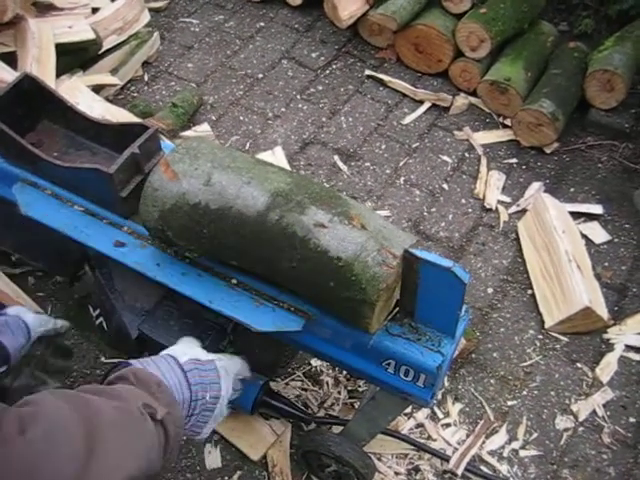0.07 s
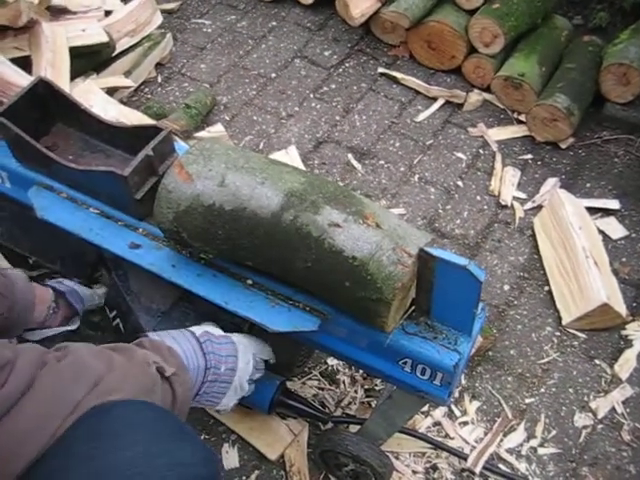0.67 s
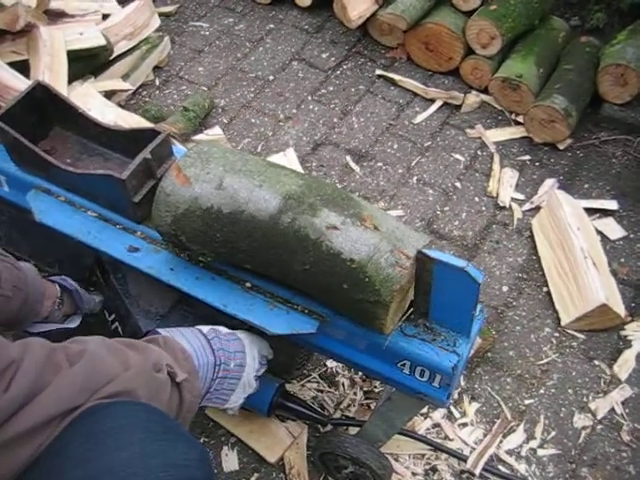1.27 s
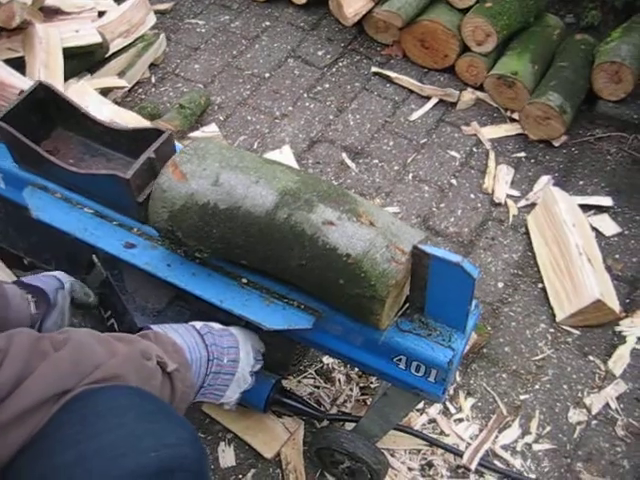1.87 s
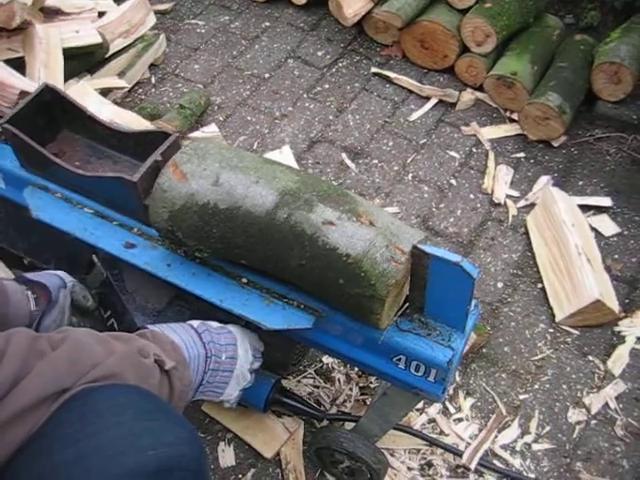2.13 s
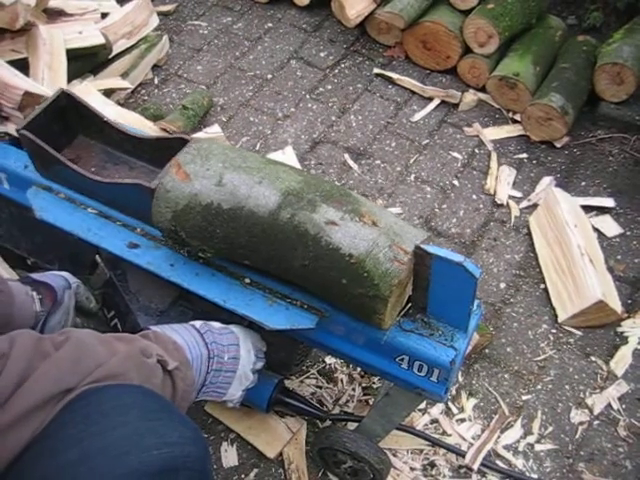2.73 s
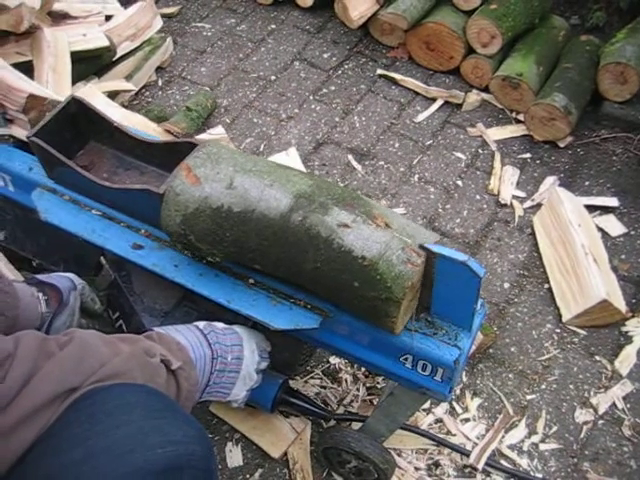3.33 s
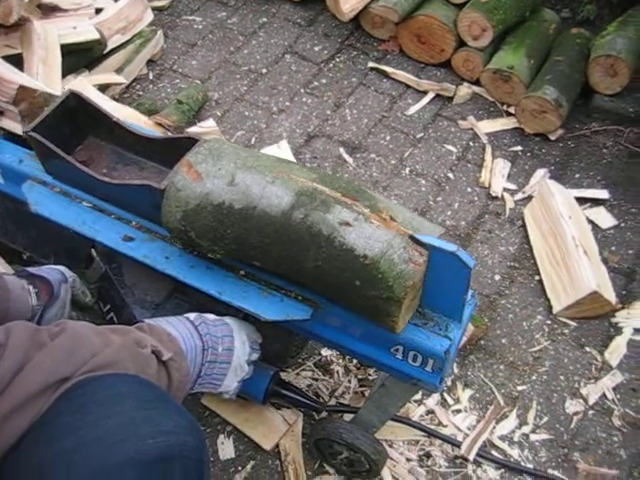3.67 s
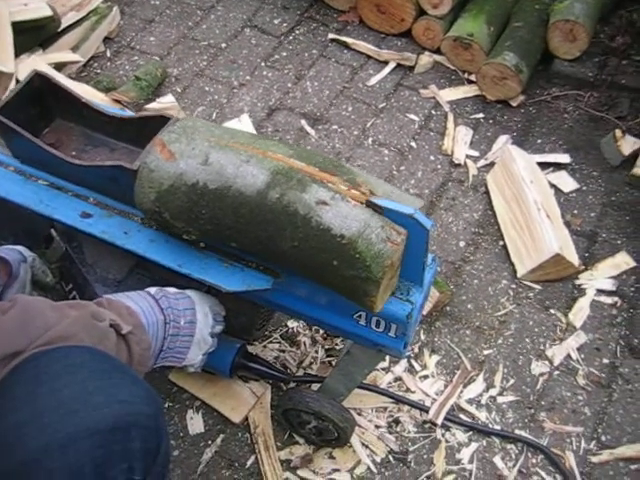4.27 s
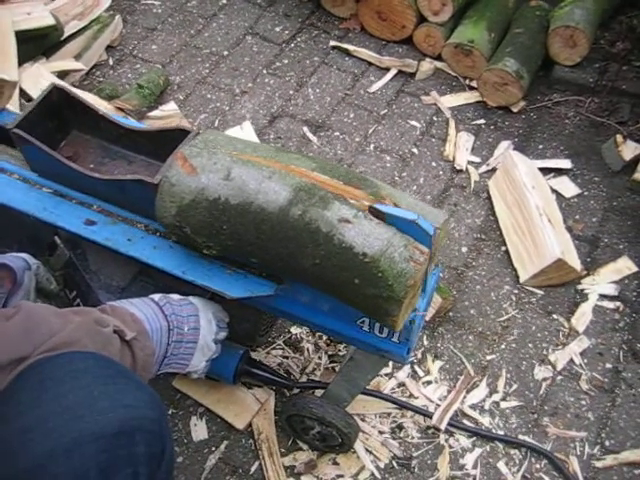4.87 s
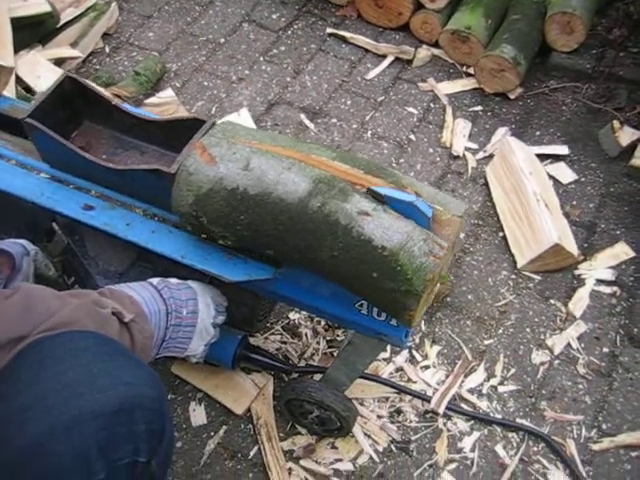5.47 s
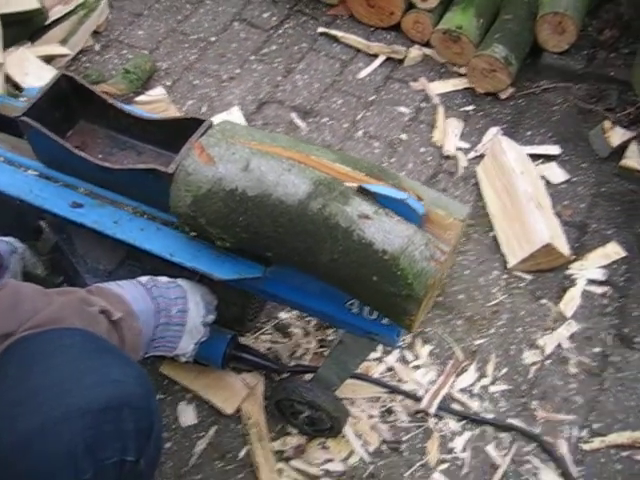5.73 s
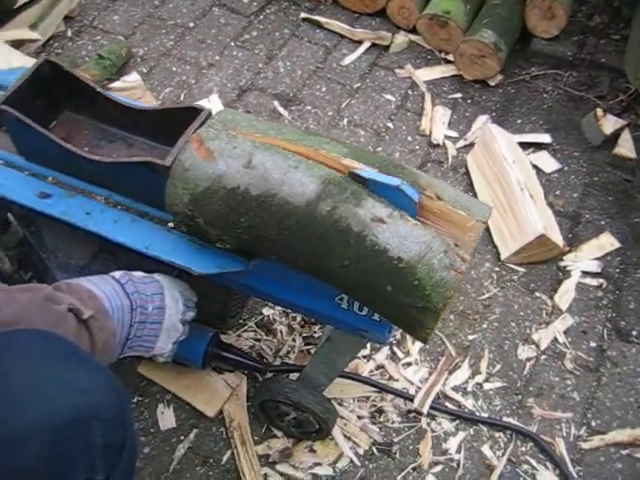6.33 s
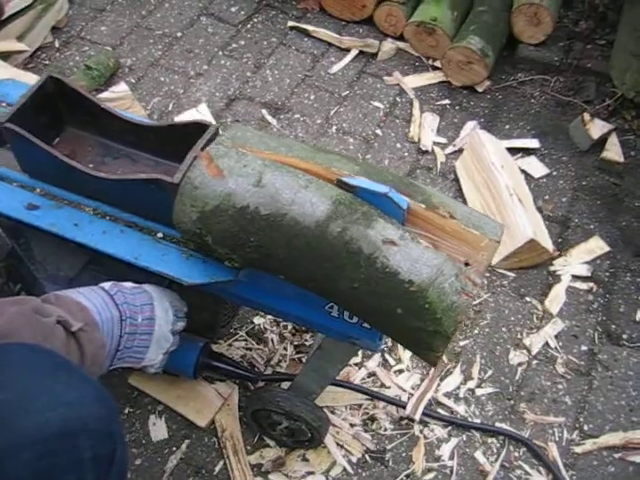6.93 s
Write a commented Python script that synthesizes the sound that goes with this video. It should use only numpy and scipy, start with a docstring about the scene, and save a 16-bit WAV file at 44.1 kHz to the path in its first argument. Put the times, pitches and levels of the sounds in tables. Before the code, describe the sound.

Birds chirp briefly in an outdoor yard, then the controls of an electric log splitter clack twice, close by. The motor starts with a harsh buzz and settles into a steady hum with pump whine and oil hiss. It strains, and the log gives way in a quick run of sharp cracks while the machine drops in level. Scattered pops and ticks of tearing wood follow as the drone slowly returns. The sound is mono and slightly dull.

```python
"""Birds chirp over a paved yard, then the controls of an electric hydraulic log splitter clack, close by. The
motor runs up with a harsh buzz from its starting winding and settles to a mains hum, while the gear pump whines
and the oil hisses. The ram presses the log on the wedge until the motor sags; the wood gives way in a run of
cracks as the level of machine and yard dips deeply and recovers slowly, then tears with scattered pops. Mono,
narrow band."""
import sys
import numpy as np
from scipy import signal
from scipy.fft import rfft, irfft, next_fast_len
from scipy.io import wavfile
from scipy.ndimage import uniform_filter1d

SR = 44100
rng = np.random.default_rng(int(sys.argv[2]) if len(sys.argv) > 2 else 0)


def to_wav(sig):
    """Store sig (one row per channel, or 1-D mono) as 16-bit WAV at the path in sys.argv[1].

    Samples outside -1..1 are clipped; the rate is SR.
    """
    pcm = np.clip(np.atleast_2d(sig), -1, 1) * 32767
    pcm = np.round(pcm).astype(np.int16)
    wavfile.write(sys.argv[1], SR, pcm.T)  # frames by channels


N = 317079
T = np.arange(N) / SR

# the machine's faders: voice -> (running free [dB], then offsets: starting [dB], wedge in the wood [dB],
# log parted [dB], full strain [dB])
VOICE_LEVELS = {"hum": (-33, 1, -0.9, -0.6, -12), "frame buzz": (-28.5, -7.5, -3.5, -4, -2),
                "rattle": (-28.5, 3, 0.5, -0.5, 0), "hiss": (-31.5, 2.5, 1.4, 1.5, 1),
                "lesser tones": (-26.5, -5.5, 0.5, 0.56, 1), "tooth rate": (-47, -3.5, 16, 1, 6.5),
                "tooth octave": (-34, -8.5, -8.5, -2, 20), "rotor whine": (-38, 2, 2.5, 3.5, -3)}
# the motor runs up, overshoots and settles: (time [s], speed [turns/s])
SHAFT_SPEED = [(0.82, 2), (0.94, 29), (1.0, 46), (1.06, 51.4), (1.13, 50.3), (1.22, 49.7), (1.38, 49.7),
               (1.44, 49.1), (1.62, 49.58)]
# the level of machine and yard dips deeply as the log breaks and recovers slowly: (time [s], level [dB])
LEVEL_DIPS = [(.7, 2), (.9, 0), (3.2, -1.5), (3.3, -11), (3.38, -16), (3.54, -13.5), (3.62, -8),
              (3.69, -13), (3.82, -7.5), (4.25, -8), (5.0, -6.5), (5.8, -3), (7.19, -2.5)]
# overtones of the hum in the frame: (multiple of the mains frequency, level [dB])
FRAME_BUZZ = [(4, -7.5), (6, 0.5), (8, -8), (10, -24.5), (12, -21), (20, -10)]
# buzz of the starting winding: (frequency at full speed [Hz], level [dB])
STARTER_TONES = [(398, -34.5), (510, -35), (748.3, -35), (899.0, -36.5), (1190, -33), (1292, -32),
                 (1394, -40.5), (1491, -37), (1674, -34), (2528, -34), (2615, -32.5), (2985, -38),
                 (3362, -38.5), (3635, -36.5), (3738, -36), (3820, -40), (4960, -45)]
# the pump's lesser tones: shaft multiple -> (level, ram biting [dB], level, log parting [dB])
PUMP_TONES = {10: (-33.5, -40.5), 11: (-40, -50.5), 16: (-43, -60.5), 20: (-50.5, -44.5), 24: (-39.5, -52),
              25: (-48.5, -46), 26: (-45.5, -41.5), 27: (-38.5, -43.5), 31: (-48.5, -47), 33: (-38, -39),
              42: (-51, -45), 44: (-43, -47), 45: (-44.5, -51), 48: (-49, -48), 49: (-44.5, -47),
              50: (-53, -44.5), 51: (-39, -38.5), 52: (-44, -36.5), 53: (-40.5, -60.5), 54: (-43, -40),
              56: (-61, -48.5), 63: (-55, -42.5), 64: (-38, -55), 72: (-38.5, -43), 73: (-40.5, -45.5),
              99: (-49.5, -51.5), 100: (-44.5, -55), 104: (-53, -50), 105: (-47, -47), 106: (-48.5, -55.5)}
# contour for the remaining shaft multiples: (frequency [Hz], level [dB])
PUMP_COMB = [(200, -55.5), (600, -61), (1300, -53.5), (2000, -51.5), (2700, -56.5), (3400, -51.5),
             (4100, -59.5), (5000, -59), (5800, -64)]
# how well the housing radiates the lesser tones: (frequency [Hz], gain [dB])
HOUSING_EQ = [(500, 0), (1400, 1), (2100, 2.5), (2550, 0), (3000, -2), (3600, 1.5), (4400, -1), (4950, 3),
              (5280, 4), (5800, 5.5)]
# colour of the housing's rattle: (frequency [Hz], level [dB])
RATTLE_EQ = [(60, -18), (150, -12), (260, -1.5), (450, -6), (650, -0.5), (900, -2.5), (1200, 1.5),
             (1500, -2.5), (1900, -7), (2400, -7), (4000, -46)]
# colour of the valve's hiss: (frequency [Hz], level [dB])
HISS_EQ = [(1200, -14.5), (1800, -3), (2200, 1), (2600, 3.5), (2950, 2), (3500, -1), (4000, 0.5),
           (4500, -2), (5200, -1.5), (5600, -11.5), (6000, -17)]
# wood cracks: (time [s], level [dB], ring [Hz], ring width [Hz], knock against snap [dB], spray t60 [s])
CRACK_CUES = [(1.41, -12.5, 2020, 700, -20, 0.069), (1.582, -11.5, 2720, 900, -25, 0.1),
              (3.2625, -7, 3600, 2590, -13, 0.025), (3.2815, -7, 3400, 3000, -18, 0.023),
              (3.2992, -9.5, 3400, 2500, -9, .02), (3.3121, -12, 3410, 2510, -25, 0.092),
              (3.3752, -10, 3150, 2600, -17, .044), (3.3935, -9.5, 4340, 1790, -19, 0.0061),
              (3.4455, -10, 3500, 2800, -16, 0.047), (3.4943, -9, 4230, 2400, -31, 0.0093),
              (3.6437, -2, 4200, 1600, -6, .011), (3.876, -15, 3650, 900, -23, 0.01),
              (3.8998, -18.5, 5300, 1000, -16, 0.015), (3.916, -15, 3400, 2200, -11, .02),
              (3.989, -13, 4450, 1300, -16, 0.016), (4.0295, -6.5, 3400, 2370, -6.5, 0.013),
              (4.277, -18, 3900, 800, -12, 0.032), (4.574, -13.5, 2450, 2030, -5, 0.017),
              (4.9671, -11, 4230, 690, -12, 0.0086), (5.9822, -8, 2240, 450, -9, 0.0081),
              (6.1818, -8, 3950, 750, -20, .02), (6.5473, -10, 4660, 2200, -27, .007)]
# the log's knock: (frequency [Hz], level [dB], t60 [s])
LOG_MODES = [(435, -7, 0.064), (810, -3, 0.051), (1010, 0, 0.1), (1092, 16, 0.037), (1400, 3.5, 0.052),
             (2220, -13.5, 0.026)]
# switch and lever: (time [s], peak [dB], ring time factor, centre of the blow's spectrum [Hz],
# its width [octaves], scrape against ring [dB])
CLACK_CUES = [(0.7362, -5, 0.98, 1980, 0.33, 7), (0.815, -4, 0.62, 900, 1.6, -2)]
# the steel they strike: (frequency [Hz], level [dB], base t60 [s])
STEEL_MODES = [(480, -1.5, 0.15), (824, -10, 0.053), (900, 4, .04), (1045, 10.5, 0.067), (1230, -7, 0.024),
               (1710, -16.5, 0.8), (1953, -15.5, 0.43), (2360, 8.5, 0.036), (2490, 6, 0.032),
               (2760, -16.5, 0.096), (2870, -11.5, 0.082), (3340, -10.5, .05), (4200, -0.5, 0.044)]
# colour of their scrape: (frequency [Hz], level [dB])
SCRAPE_EQ = [(200, -17.5), (700, -16.5), (1200, 3), (1900, -14), (2700, 4.5), (3600, -4.5),
             (5500, -19.5), (7000, -43)]
# bumps, creaks and rings, a soft handling thump, and brief swells of the pump's tooth tone and the
# rotor whine: (peak time [s], rise [s], fall [s], frequency [Hz], resonator width [Hz], level [dB])
SWELL_CUES = [(0.08, .04, .07, 1760, 90, -52), (0.59, .025, 0.032, 196, 130, -38.5),
              (0.779, .02, 0.045, 170, 230, -40.5), (0.87, .002, 0.014, 745, 110, -28),
              (0.924, 0.0022, 0.0087, 684, 200, -19.5), (0.94, 0.019, .017, 777, 160, -18.5),
              (0.955, 0.037, .05, 3250, 850, -25.5), (0.985, .02, .03, 1250, 600, -25.5),
              (0.986, 0.015, 0.024, 294, 75, -23.5), (0.975, 0.019, .025, 200, 70, -32.5),
              (1.04, 0.081, .1, 412, 90, -33), (1.41, .02, 0.066, 239, 180, -25.5),
              (1.53, 0.04, 0.061, 488, 130, -28), (2.83, 0.14, 0.07, 421, 110, -30),
              (2.95, .036, .055, 450, 25, -27.5), (3.03, 0.12, 0.25, 523, 110, -33),
              (1.55, .02, 0.026, 4050, 300, -28), (3.083, .03, 0.02, 4460, 330, -30.5),
              (3.252, 0.041, 0.075, 4830, 600, -30.5), (3.297, .017, 0.017, 220, 170, -27),
              (3.369, .025, 0.065, 4200, 1600, -30), (3.46, 0.0045, 0.021, 190, 150, -35),
              (3.63, .018, 0.0092, 4180, 2200, -37), (5.8, 0.024, 0.045, 119, 130, -37),
              (6.12, 0.092, .07, 3050, 700, -31), (6.551, .15, .14, 2920, 170, -37.5),
              (6.8, .13, .13, 1437, 8.3, -33.5)]
# bird notes: (start [s], length [s], first pitch [Hz], last pitch [Hz], arch [Hz], level [dB], rasp)
BIRD_NOTES = [(0.217, .09, 3620, 3740, 60, -47, 40), (0.381, 0.072, 5270, 4130, -350, -36.5, 400),
              (0.42, 0.086, 4470, 4520, 0, -46, 500), (0.569, 0.05, 4700, 4130, -200, -42, 350),
              (0.625, .095, 3700, 3780, 100, -40, 45), (0.736, 0.091, 3580, 3340, -33, -37.5, 45)]
# colour of the outdoor air: (frequency [Hz], level [dB])
AIR_EQ = [(12, -19), (20, -12.5), (51, -16), (82, -23), (148, -25), (319, -29), (395, -28), (1540, -33.5),
          (1730, -34), (2600, -34.5), (3630, -33), (5330, -38), (6000, -58.5), (7800, -87.5), (13200, -120)]
# colour of the low rumble: (frequency [Hz], level [dB])
RUMBLE_EQ = [(20, 1), (55, -5), (120, -3), (250, -10), (1000, -60.5)]

MAINS_HZ, GEAR_TEETH = 50, 9
FULL_SPEED, SAG_SPEED = 49.58, 1.4  # turns/s: running free, lost at full strain
STRAIN_FROM_S, GIVES_S, RELAX_S = 2.87, 3.28, .1
# stages of the stroke: (start [s], fade length [s])
HUM_ON, OIL_ON, WINDING_IN, WINDING_OUT = (.83, .11), (.86, .13), (.985, .054), (1.365, .024)
SETTLES, BITES, OPENS, PARTS = (1.5, .22), (2.51, .51), (3.97, 1.8), (5.68, .36)
STARTER_DB, JUDDER_TURNS, JUDDER_FADE_S = 1, .006, .09
SWITCH_OVER_DB = -5.5  # the hum falters when the starting winding drops out
CREEP_S, CREEP_DB = .0061, -13.5  # fibres start to tear just before each crack
SNAPS_PER_S, SNAP_FLOOR_DB = 28, -28.5
STRAIN_SNAPS_PER_S, STRAIN_SNAP_DB = 1300, 5.5  # added at full strain
BAND_EDGE_HZ, TOP_HZ = 5950, 15800


def motor_hum():
    """The stator is squeezed twice a mains cycle and thumps the frame, unevenly until the motor settles."""
    angle = 2 * np.pi * (MAINS_HZ * T + .0053 * drift(12))
    flutter = .072 + .66 * (1 - ramp(SETTLES))
    buzz = sum(amp(db) * (1 + flutter * drift(15)) * np.cos(round(k) * angle) for k, db in FRAME_BUZZ)
    falter = amp(SWITCH_OVER_DB * (ramp(WINDING_OUT) - ramp(SETTLES)))
    hum = falter * np.cos(2 * angle)
    return -np.sqrt(2) * (ramp(HUM_ON) * fader("hum") * hum + ramp(OIL_ON) * fader("frame buzz") * buzz)


def starter_buzz(shaft):
    """The starting winding makes the rotor judder and its slots buzz until it drops out."""
    judder = JUDDER_TURNS * np.exp(-np.maximum(T - WINDING_IN[0], 0) / JUDDER_FADE_S)
    rotor = shaft + judder * drift(110)
    buzz = sum(amp(db) * tone(rotor * hz / FULL_SPEED, waver=.66, rate=30) for hz, db in STARTER_TONES)
    sizzle = amp(-35) * unit_rms(noise_band(N, hz=3400, width=780))
    return amp(STARTER_DB) * (ramp(WINDING_IN) - ramp(WINDING_OUT)) * (buzz + sizzle)


def pump_whine(shaft):
    """Uneven gear teeth sing at multiples of the shaft speed; the balance shifts as the log opens."""
    leading = {GEAR_TEETH: "tooth rate", 2 * GEAR_TEETH: "tooth octave", 29: "rotor whine"}
    biting, parting = np.zeros((2, N))
    for k in range(3, 119):
        if k not in leading:
            nominal_hz = k * MAINS_HZ
            scattered_db = level_at(PUMP_COMB, nominal_hz) + 4.5 * rng.standard_normal(2)
            biting_db, parting_db = PUMP_TONES.get(k, scattered_db)
            partial = amp(level_at(HOUSING_EQ, nominal_hz)) * tone(k * shaft, waver=.39, rate=6)
            biting += amp(biting_db) * partial
            parting += amp(parting_db) * partial
    crossfade = np.maximum(ramp(OPENS), .25)
    comb = (1 - crossfade) * unit_rms(biting) + crossfade * unit_rms(parting)
    lead = sum(fader(voice) * tone(k * shaft, waver=.23, rate=12) for k, voice in leading.items())
    return fader("lesser tones") * comb + lead


def oil_flow(shaft):
    """Each tooth squeezes out a puff of oil: the housing rattles and the valve hisses."""
    angle = 2 * np.pi * shaft
    mains_ripple = .093 * np.cos(4 * np.pi * MAINS_HZ * T)
    puffs = 1 + .085 * np.cos(GEAR_TEETH * angle) + .067 * np.cos(angle) + mains_ripple
    puffs *= amp(1.4 * drift(130))
    rattle = fader("rattle") * amp(1.4 * drift(17)) * colour(puffs * rng.standard_normal(N), RATTLE_EQ)
    hiss = fader("hiss") * amp(1.2 * drift(16)) * colour(puffs * rng.standard_normal(N), HISS_EQ)
    return rattle + hiss


def wood_cracks():
    """Fibres tear, then break: a snap and a spray of smaller ones ring the splinter; the log knocks."""
    out, pre_roll = np.zeros(N), SR // 40
    t = np.arange(-pre_roll, SR // 8) / SR
    after = np.maximum(t, 0)
    knock = unit_peak(ring(LOG_MODES, after))
    lowpass = signal.butter(4, BAND_EDGE_HZ, fs=SR, output="sos")
    creep = amp(CREEP_DB) * np.exp(-abs(t) / CREEP_S)
    tail = amp(-23 - 60 * after / .094)
    for time, db, hz, width, knock_db, t60 in CRACK_CUES:
        envelope = np.where(t < 0, creep, amp(-60 * after / t60) + tail)
        spray = rng.standard_normal(len(t)) * envelope
        spray[pre_roll + 10] += 4  # the sharp transient of the break
        snap = unit_peak(signal.sosfilt(lowpass, resonate(spray, hz, width)))
        add(out, time + t[0], amp(db + 2) * unit_peak(snap + amp(knock_db) * knock))
    return out


def fibre_ticks():
    """Single fibres tick at the wedge, thickest and hardest just as the log gives way."""
    load = strain()
    rate = SNAPS_PER_S * ramp(BITES) + STRAIN_SNAPS_PER_S * load
    db = SNAP_FLOOR_DB + STRAIN_SNAP_DB * load ** 2 + 4.6 * np.minimum(rng.exponential(1, N), 2.5)
    snaps = amp(db) * (rng.random(N) < rate / SR) * rng.choice([-1, 1], N)
    t = np.arange(400) / SR
    ticks = [np.exp(-t * hz / 1.9) * np.sin(2 * np.pi * hz * t) for hz in np.geomspace(2200, 5400, 8)]
    choice = rng.integers(0, len(ticks), N)
    return sum(np.convolve(snaps * (choice == k), tick)[:N] for k, tick in enumerate(ticks))


def control_clacks():
    """A short scrape and blow from the switch or lever set the steel ringing."""
    out, t = np.zeros(N), np.arange(SR // 4) / SR
    for time, db, stretch, centre_hz, octaves, scrape_db in CLACK_CUES:
        modes = [(hz, level - 3 * (np.log2(hz / centre_hz) / octaves) ** 2, t60)
                 for hz, level, t60 in STEEL_MODES]
        # staggered mode onsets smear the attack
        body = sum(np.roll(ring([mode], t, stretch), rng.integers(0, 60)) for mode in modes)
        scrape = colour(rng.standard_normal(len(t)), SCRAPE_EQ)
        scrape *= amp(-60 * t / .024) + amp(-13.5 - 60 * t / .24)
        add(out, time, amp(db) * unit_peak(unit_peak(body) + amp(scrape_db) * unit_peak(scrape)))
    return out


def bumps_and_swells():
    """Noise bands swell and fade as bumps, creaks, rings, a handling thump, tooth tone and rotor whine."""
    out = np.zeros(N)
    for time, rise, fall, hz, width, db in SWELL_CUES:
        t = np.arange(-2 * rise, 2 * fall, 1 / SR)
        band = noise_band(SR, hz, width)[-len(t):]
        swell = np.exp(-(t / np.where(t < 0, rise, fall)) ** 2)
        add(out, time - 2 * rise, amp(db) * unit_rms(swell * band) * np.sqrt(np.mean(swell ** 2)))
    return out


def birds():
    """Thin whistles and raspy chirps: each note glides in an arch, swells and fades."""
    out = np.zeros(N)
    for start, length, first_hz, last_hz, arch_hz, db, rasp in BIRD_NOTES:
        progress = np.arange(0, length, 1 / SR) / length
        arch = np.sin(np.pi * progress)
        jitter = unit_rms(uniform_filter1d(rng.standard_normal(SR), 40))[:len(arch)]
        hz = first_hz + (last_hz - first_hz) * progress + arch_hz * arch + .6 * rasp * jitter
        envelope = arch ** .49 * (1 + .42 * drift(150)[:len(arch)])
        add(out, start, np.sqrt(2) * amp(db) * envelope * np.sin(2 * np.pi * np.cumsum(hz) / SR))
    return out


def yard_air():
    """A bed of outdoor air with an uneven low rumble."""
    air = amp(-44) * colour(rng.standard_normal(N), AIR_EQ)
    rumble = colour(rng.standard_normal(N), RUMBLE_EQ)
    return air + amp(-54 + 2.6 * drift(6.4)) * rumble


def strain():
    """The load on the ram builds to 1 at the moment the log gives way, then relaxes."""
    build = np.clip((T - STRAIN_FROM_S) / (GIVES_S - STRAIN_FROM_S), 0, 1) ** 2
    return build * np.exp(-np.maximum(T - GIVES_S, 0) / RELAX_S)


def fader(voice):
    """A voice's gain follows the stage of the stroke and the strain."""
    free_db, starting_db, wedged_db, parted_db, strained_db = VOICE_LEVELS[voice]
    parted = ramp(PARTS)
    stage_db = starting_db * (1 - ramp(SETTLES)) + wedged_db * (ramp(BITES) - parted) + parted_db * parted
    return amp(free_db + stage_db + strained_db * strain())


def ramp(stage):
    """Fades from 0 to 1 as a stage of the stroke sets in."""
    start, length = stage
    return np.clip((T - start) / length, 0, 1)


def automation(points):
    """A curve through (time, value) breakpoints."""
    return np.interp(T, *np.transpose(points))


def drift(rate):
    """A random wander with `rate` new values a second."""
    return np.interp(T * rate, np.arange(2048), rng.standard_normal(2048))


def tone(turns, waver, rate):
    """A partial of rms near 1 whose strength and phase waver."""
    strength, slip = 1 + waver * drift(rate), waver * drift(rate)
    return np.sqrt(2) * strength * np.cos(2 * np.pi * (turns + rng.random()) + slip)


def ring(modes, t, stretch=1):
    """The decaying modes of a struck body."""
    return sum(amp(db - 60 * t / (t60 * stretch)) * np.sin(2 * np.pi * hz * t) for hz, db, t60 in modes)


def resonate(x, hz, width):
    """A resonance of gain 1, its width in Hz."""
    carrier = np.exp(2j * np.pi * hz * np.arange(len(x)) / SR)
    pole = np.exp(-np.pi * width / SR)
    return 2 * (carrier * signal.lfilter([1 - pole], [1, -pole], x / carrier + 1e-18)).real


def noise_band(samples, hz, width):
    """Noise passed twice through a resonance."""
    return resonate(resonate(rng.standard_normal(samples), hz, width), hz, width)


def level_at(eq, hz):
    """An EQ curve's level in dB, on a log-frequency axis."""
    freqs, db = np.transpose(eq)
    return np.interp(np.log(hz + 1), np.log(freqs + 1), db)


def colour(x, eq):
    """Applies an EQ curve and scales to rms 1."""
    size = next_fast_len(len(x))
    gain = amp(level_at(eq, np.fft.rfftfreq(size, 1 / SR)))
    return unit_rms(irfft(rfft(x, size) * gain, size)[:len(x)])


def amp(db):
    """Decibels to gain."""
    return 10 ** (np.asarray(db) / 20)


def unit_rms(x):
    """Scales to rms 1."""
    return x / np.sqrt(np.mean(x ** 2) + 1e-20)


def unit_peak(x):
    """Scales to peak 1."""
    return x / (abs(x).max() + 1e-20)


def add(mix, time, sound):
    """Drops a sound into the mix at a time in seconds."""
    part = mix[max(round(time * SR), 0):][:len(sound)]
    part += sound[:len(part)]


def scene():
    """Machine, log and yard in mono; the shaft slows under strain."""
    speed = automation(SHAFT_SPEED) - SAG_SPEED * strain() + .012 * drift(25)
    shaft = np.cumsum(speed) / SR  # turns
    machine = motor_hum() + starter_buzz(shaft) + ramp(OIL_ON) * (pump_whine(shaft) + oil_flow(shaft))
    bed = amp(automation(LEVEL_DIPS)) * (machine + yard_air())
    mono = bed + fibre_ticks() + bumps_and_swells() + control_clacks() + wood_cracks() + birds()
    return np.array([mono, mono])


def record(dry):
    """A narrow-band microphone chain; the hardest crack overloads it with a bright tick."""
    band_filter = signal.firwin(201, BAND_EDGE_HZ, window=("kaiser", 8), fs=SR)
    top_filter = signal.firwin(255, TOP_HZ, window=("kaiser", 9), fs=SR)
    narrow = signal.oaconvolve(dry, band_filter[None], "same")
    overloaded = np.clip(narrow, -.68, .68)
    return signal.oaconvolve(overloaded, top_filter[None], "same")


dry = scene()
out = record(dry)
to_wav(out)
```